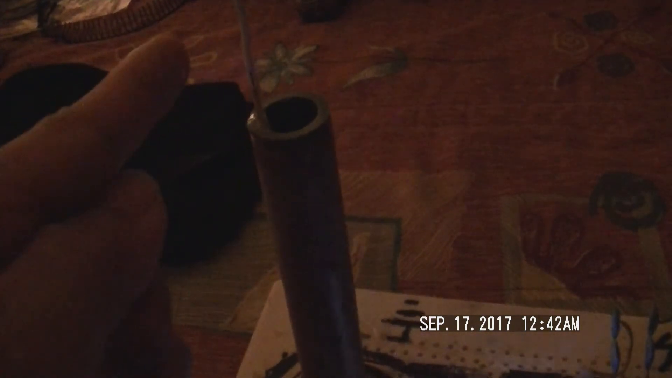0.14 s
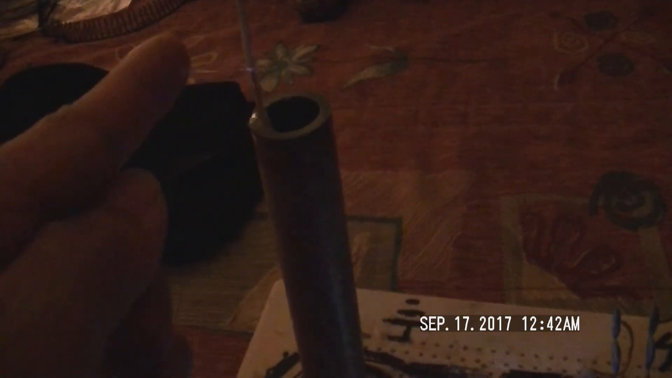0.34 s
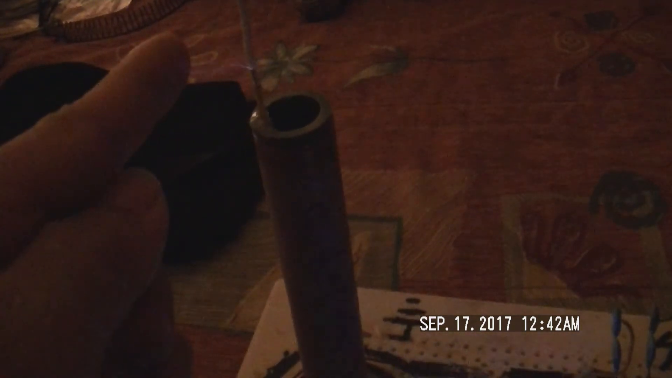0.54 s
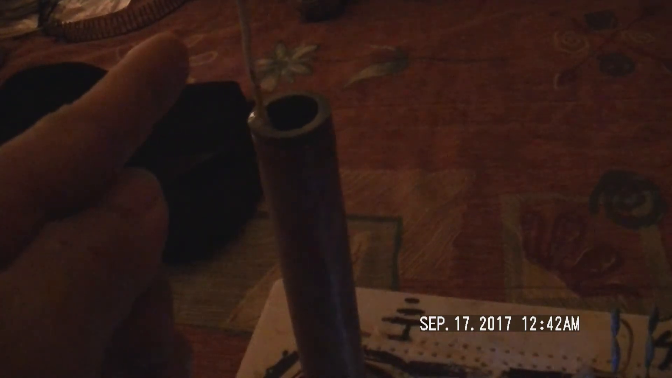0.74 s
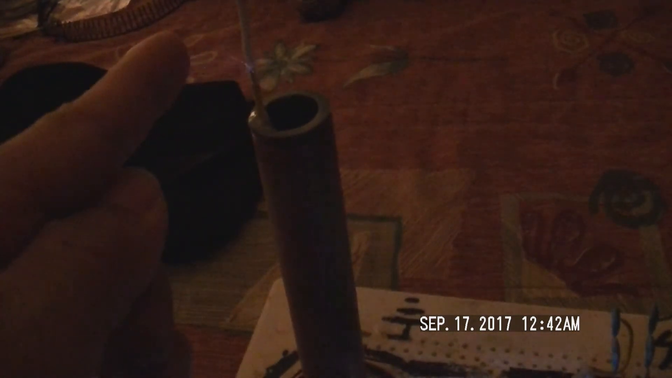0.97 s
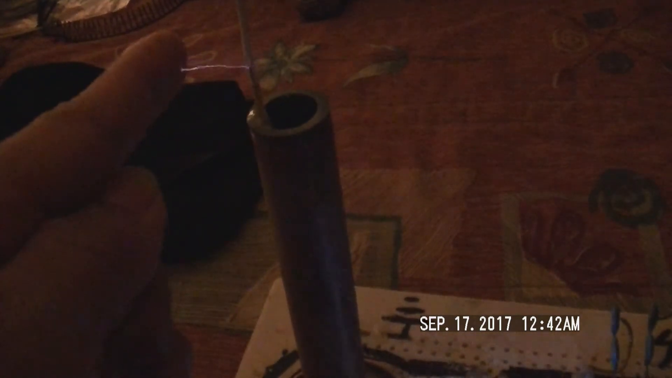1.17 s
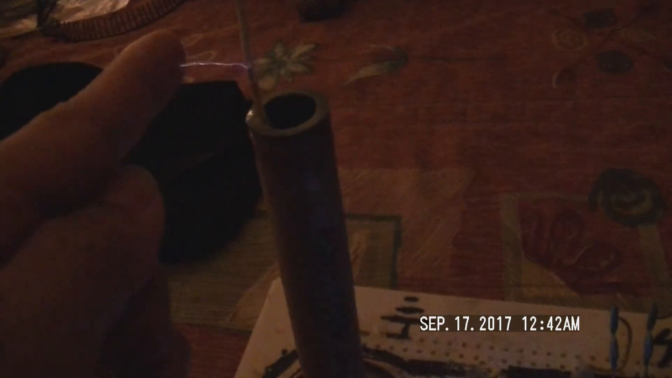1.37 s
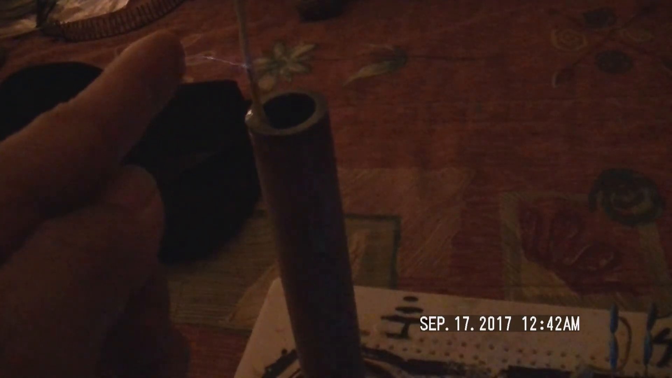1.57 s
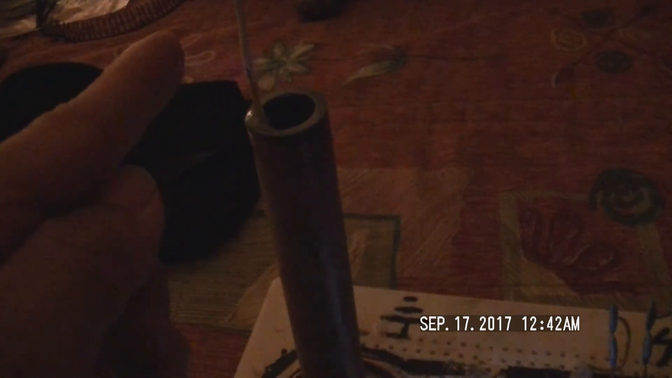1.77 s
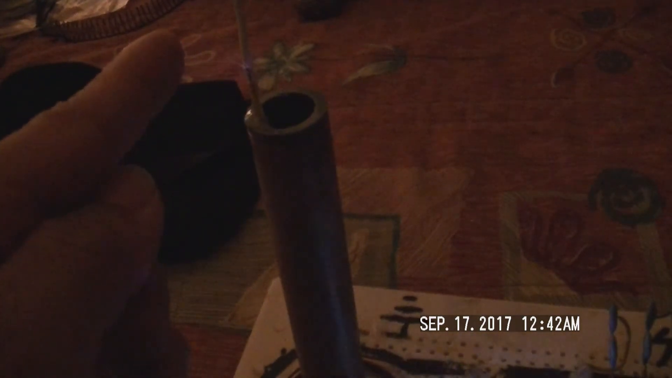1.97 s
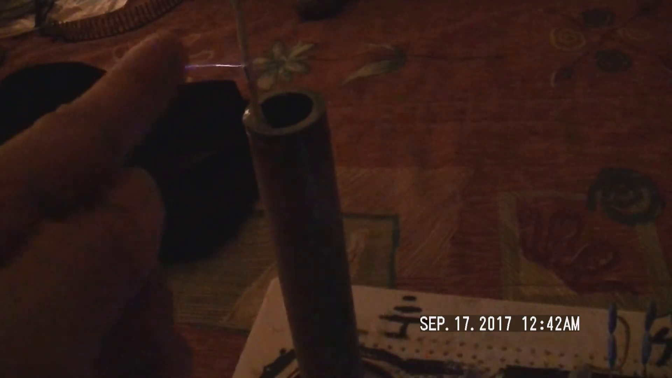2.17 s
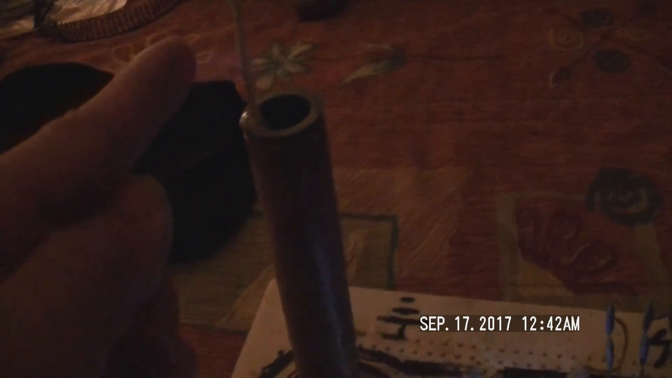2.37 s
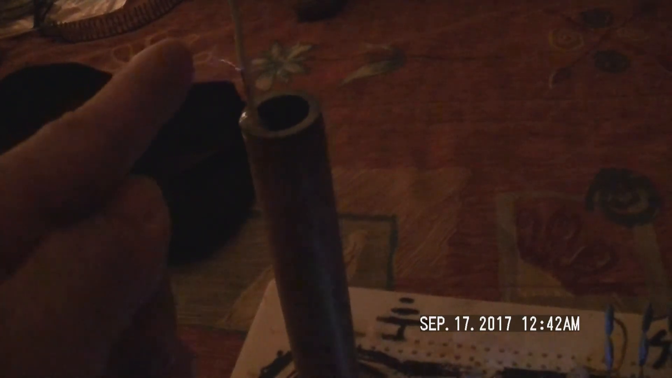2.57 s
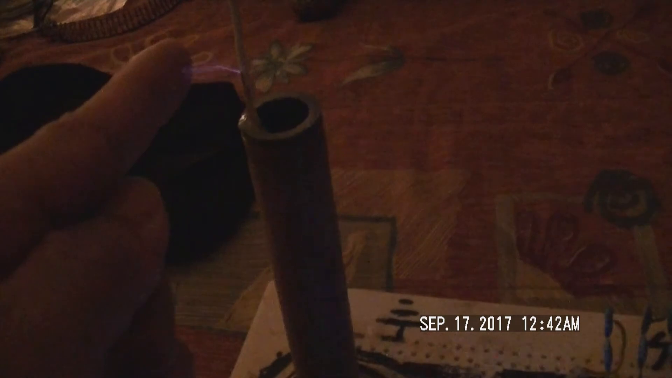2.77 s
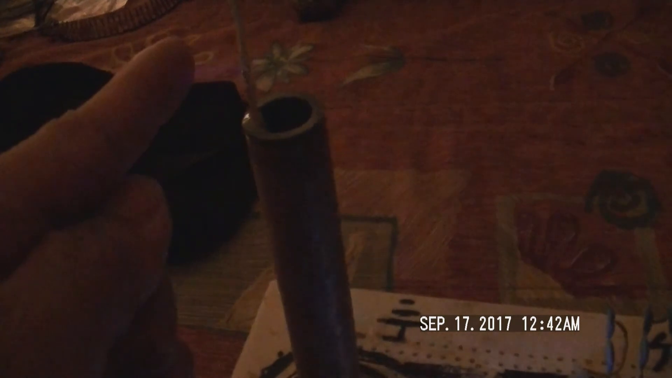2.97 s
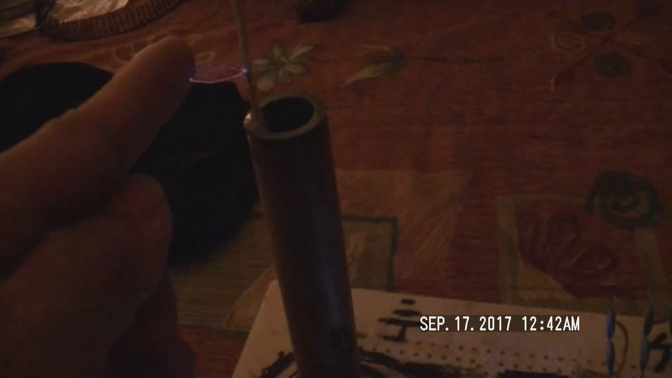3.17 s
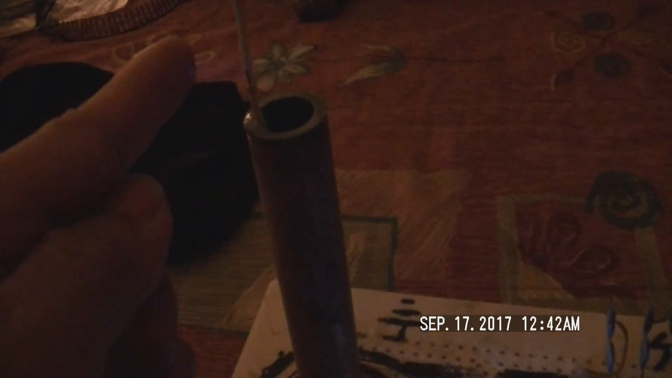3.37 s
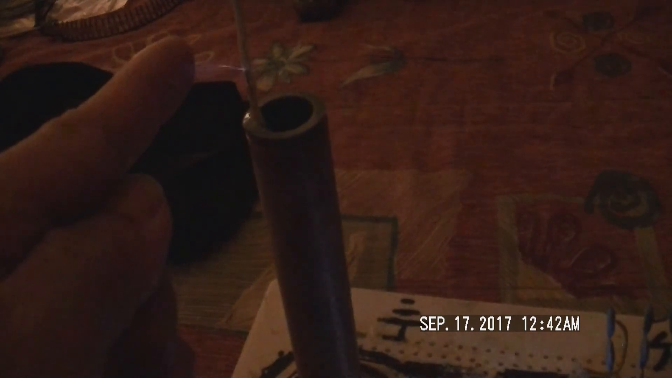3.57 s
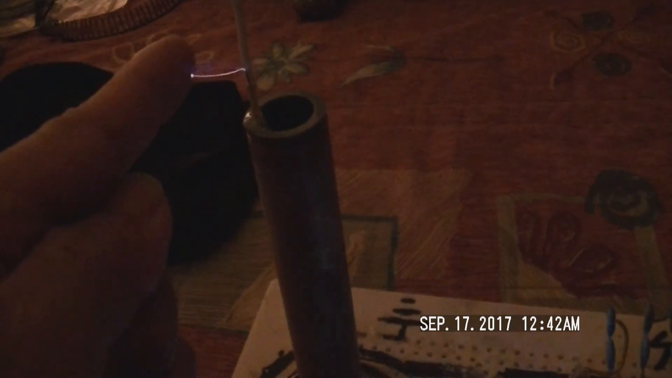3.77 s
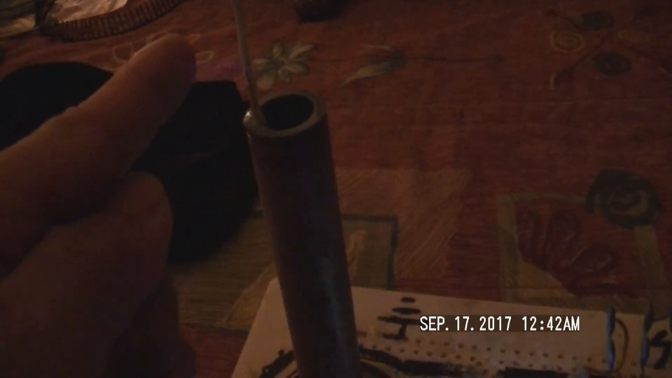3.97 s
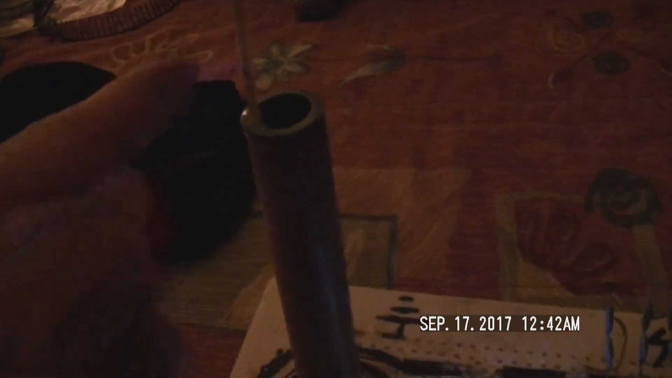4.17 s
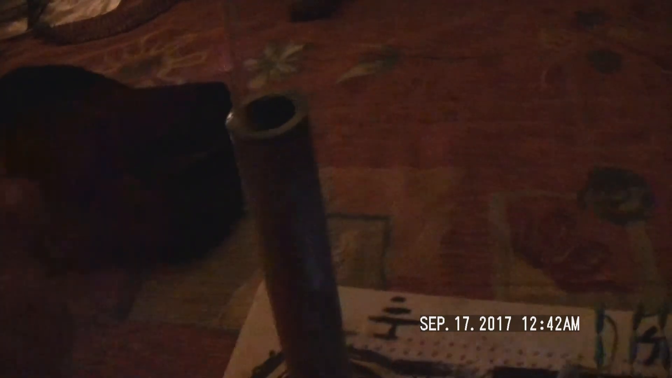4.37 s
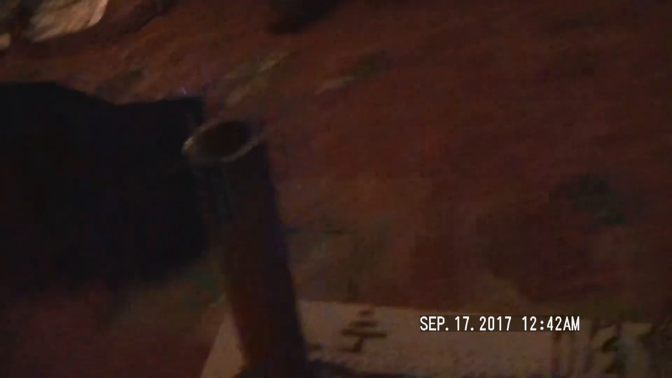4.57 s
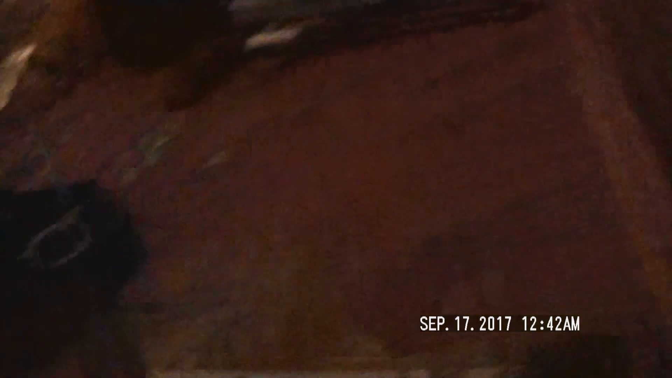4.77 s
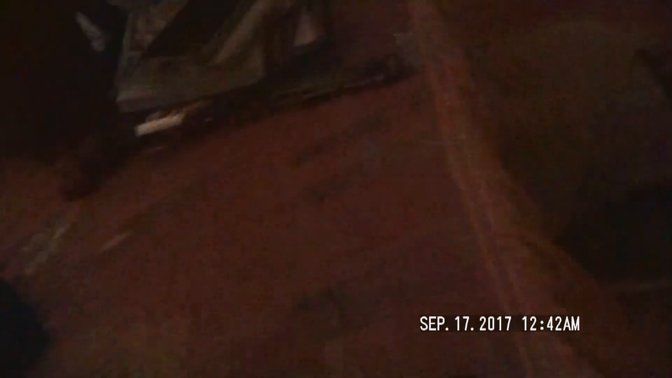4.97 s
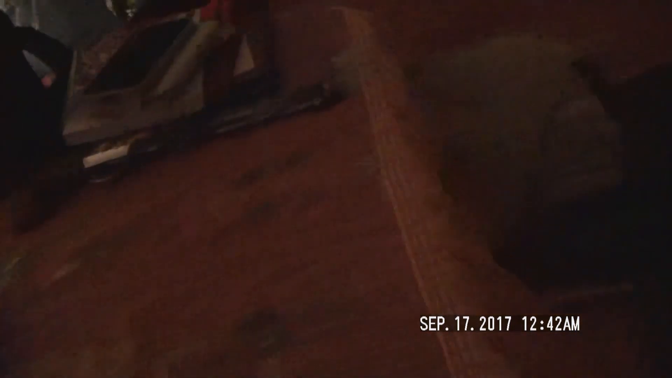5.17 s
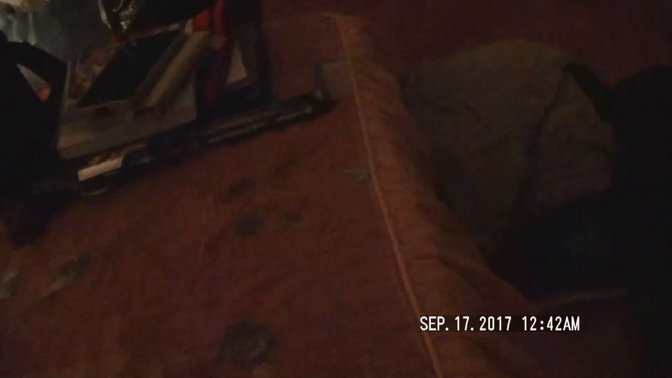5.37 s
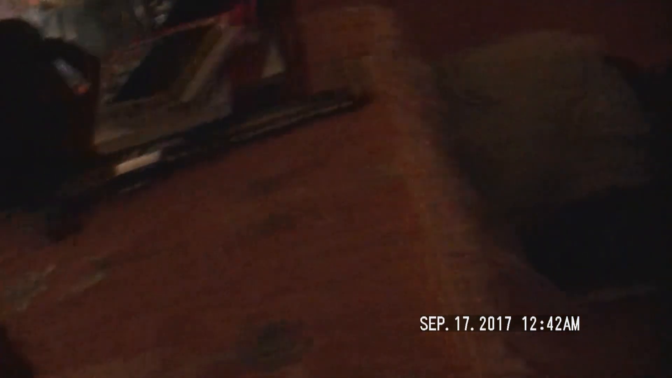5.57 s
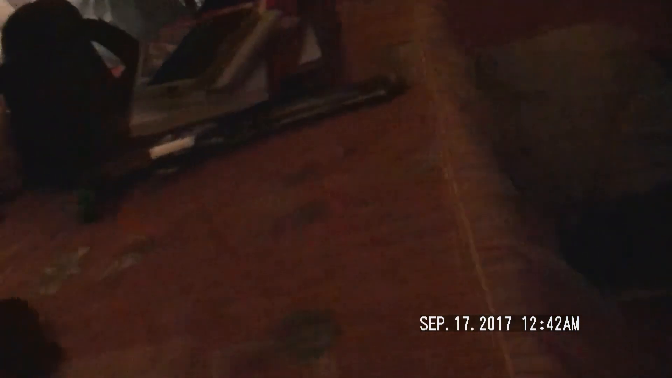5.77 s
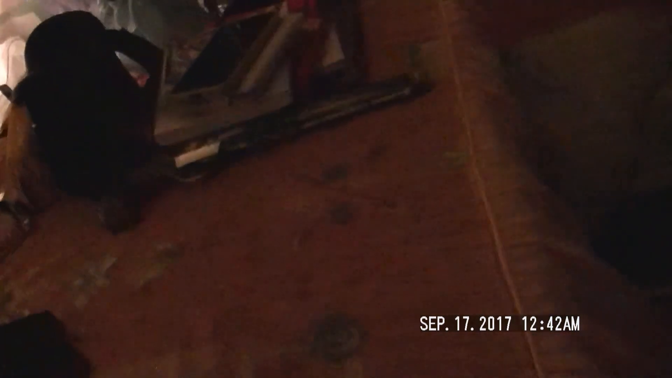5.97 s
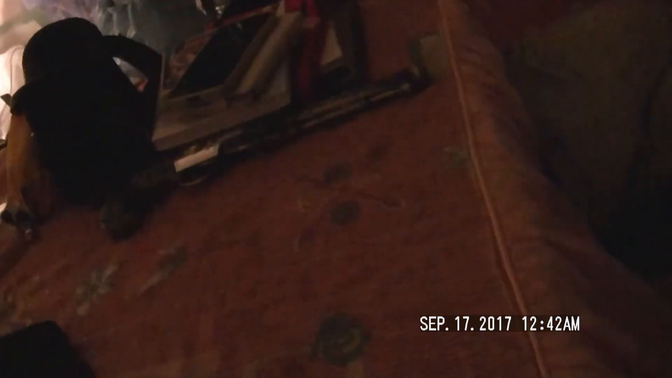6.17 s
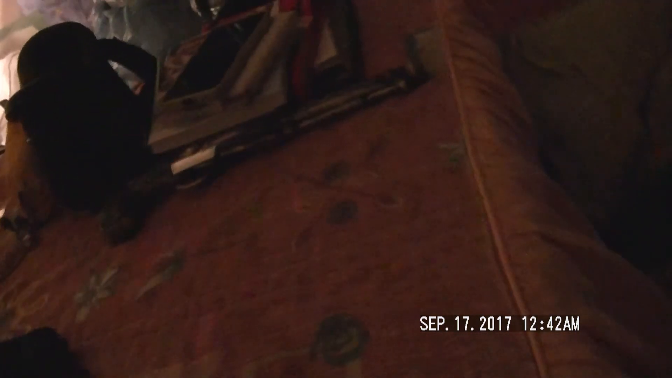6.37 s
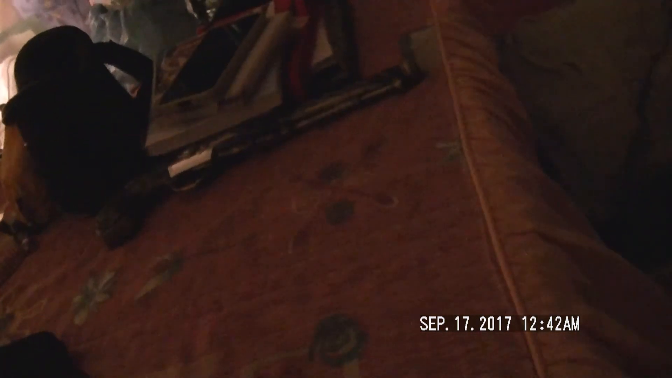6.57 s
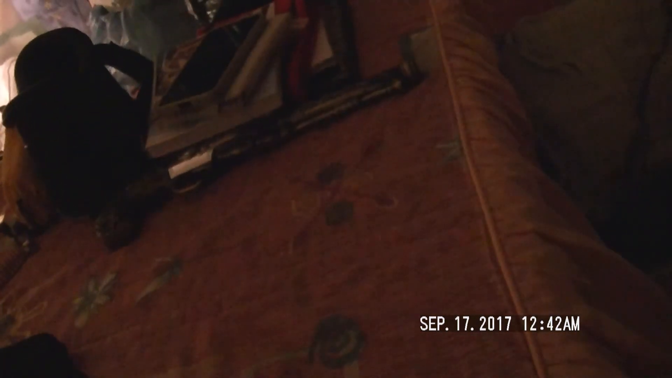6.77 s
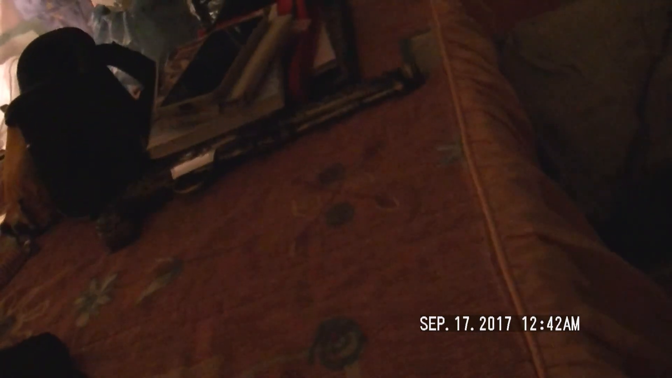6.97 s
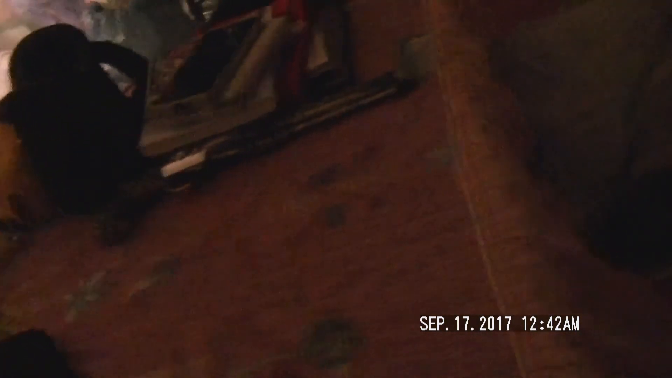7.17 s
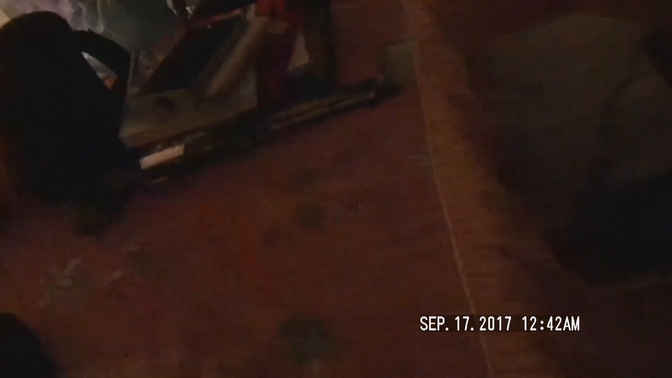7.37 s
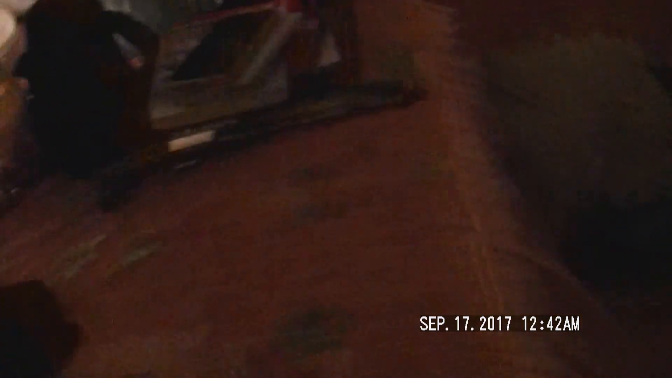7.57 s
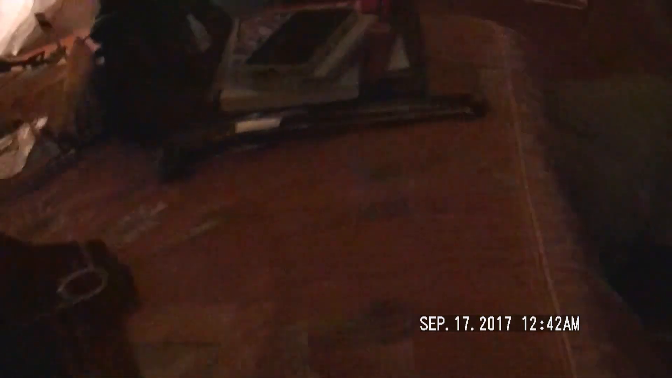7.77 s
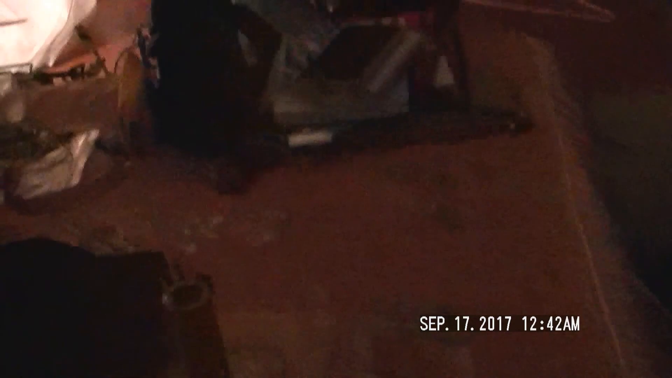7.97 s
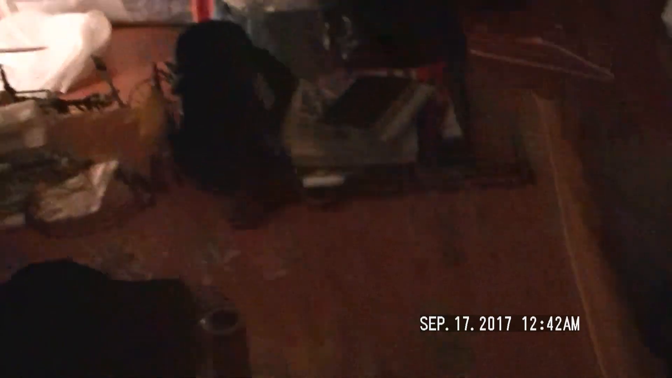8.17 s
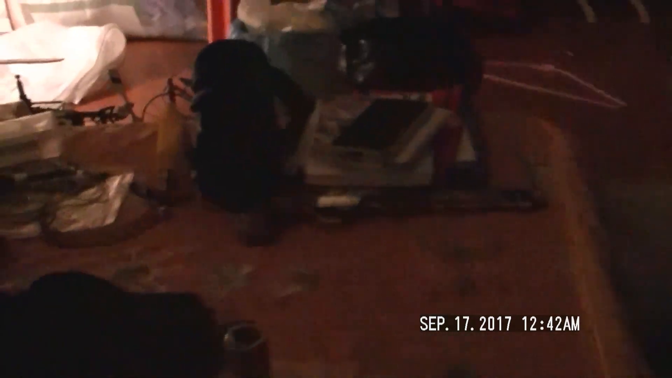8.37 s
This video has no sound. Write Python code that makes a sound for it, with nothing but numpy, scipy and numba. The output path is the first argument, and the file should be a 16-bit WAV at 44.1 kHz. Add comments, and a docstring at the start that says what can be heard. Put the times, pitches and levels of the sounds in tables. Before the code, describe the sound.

A small spark coil buzzes with rapid, sharp electric snaps, then cuts off abruptly, leaving a faint fan whine in a small room.

```python
"""A small spark-gap coil snaps about 37 times a second, arcing to a finger close to a camera in a
small room. Each snap is the gap breaking down as the capacitor fills. The finger withdraws, the
hand-held camera turns aside and the coil is switched off. The camera's gain control then lets go
and brings up a faint fan that has been whining in the background all along."""
import sys
import numpy as np
from scipy import signal
from scipy.fft import rfft, irfft
from scipy.io import wavfile
from scipy.ndimage import uniform_filter1d
from numba import njit

SR = 44100
rng = np.random.default_rng(int(sys.argv[2]) if len(sys.argv) > 2 else 0)


def master(y):
    """Save y as 16-bit WAV."""
    cut = np.clip(np.atleast_2d(y).T, -1, 1)
    pcm = np.round(cut * 32767)  # scale
    wavfile.write(sys.argv[1], SR, pcm.astype(np.int16))


N = 371751
TIME = np.arange(N) / SR


def coil(finger_leaves_s=4.17, finger_move_s=.06, scatter_db=.7, ring_db=-18.5, ring_aside_db=4.5):
    """Snaps, their fizz and the room's ring, which gains as the camera turns away."""
    # (time [s], camera turned aside [0-1])
    camera_turn = [(4.5, 0), (4.7, .15), (4.9, .42), (5.1, .65), (5.45, .88), (6.1, 1), (6.66, .96)]
    # snaps at the camera: (time [s], level [dB])
    snap_level = [(0, -21), (2.5, -19), (3.4, -20), (3.9, -22.5), (4.17, -20), (4.6, -20), (5.05, -28.5),
                  (5.45, -27), (6.1, -23.5), (6.66, -23.5)]
    times = spark_times()
    turn = curves(camera_turn, times)[0]
    away = np.interp(times, [finger_leaves_s, finger_leaves_s + finger_move_s], [0, 1])
    level_db = curves(snap_level, times)[0] + scatter_db * rng.standard_normal(len(times))
    room_db = level_db + ring_db + ring_aside_db * turn
    out = snaps(times, level_db[:, None], away[:, None], turn[:, None]) + fizz(times, level_db)
    flat = np.ones((len(times), 257)) / np.sqrt(3)  # power split over three wall paths
    for shift_s in (-.0007, .0002, .0008):  # turning shortens or lengthens each path
        tremor_s = .00012 * (1 + turn) * uniform_filter1d(rng.standard_normal(len(times)), 15)
        out += room(train(times + shift_s * turn + tremor_s, flat, room_db[:, None]))
    return out


def spark_times(start_charge=.177, jitter_s=.0002, off_s=6.67, sag=.18, sag_s=.05):
    """The gap fires at each full charge; charging slows as the supply collapses at switch-off."""
    # capacitor recharge at full supply: (time [s], rate [charges/s])
    charge_rate = [(0.0, 37.87), (0.18, 36.48), (1.0, 37.44), (1.39, 36.66), (1.52, 37.29), (1.72, 36.03),
                   (2.24, 36.68), (3.28, 36.99), (3.84, 36.45), (3.92, 37.83), (4.1, 35.45), (4.22, 36.55),
                   (6.5, 36.28)]
    supply = 1 - sag * np.exp(np.minimum(TIME - off_s, 0) / sag_s)
    charge = start_charge + np.cumsum(curves(charge_rate, TIME)[0] * supply) / SR
    times = np.interp(np.arange(1, charge[-1]), charge, TIME)
    times = times[times < off_s]
    return times + jitter_s * rng.standard_normal(len(times))


def snaps(times, level_db, away, turn, smear_s_per_hz=4.4e-8, front_pan_db=-3, aside_pan_db=-.5):
    """One sharp snap per spark, treble arriving last, with close echoes, at two microphone ports."""
    hz = np.fft.rfftfreq(512, 1 / SR)
    front = np.interp(turn, [0, .3], [1, 0])
    smear = np.exp(-1j * np.pi * smear_s_per_hz * (hz - 8500) ** 2)
    snap = undb(snap_colour_db(hz, away, turn, front)) * (1 + echoes(times, hz)) * smear
    snap /= np.sqrt(np.mean(abs(snap) ** 2, axis=1, keepdims=True))
    # the ports are so close that only one treble band differs
    band = np.exp(-.5 * ((hz - 9000) / 1100) ** 2)
    pan_db = (aside_pan_db + front * (front_pan_db - aside_pan_db)) * band
    phase_rad = -.14 * band
    ports = [snap * undb(side * pan_db) * np.exp(1j * side * phase_rad) for side in (.5, -.5)]
    return np.array([train(times, spectra, level_db) for spectra in ports])


def snap_colour_db(hz, away, turn, front):
    """Tone follows finger and camera angle and varies slightly per snap, most in the top treble."""
    # arc to the finger: (frequency [Hz], level [dB])
    to_finger = [(50, -22), (90, -15.5), (170, -10), (320, -6), (540, -9.5), (740, -4), (950, -10),
                 (1400, -4.5), (1950, -5), (2200, -10), (2500, -3.5), (3250, 8.5), (3750, 2.6), (4500, 6.5),
                 (6100, 7), (6700, 11), (7600, 13), (9100, 9.5), (11100, 13), (12700, 7.5), (13500, -13),
                 (14100, -2), (14800, -8), (15500, -3), (16000, -13)]
    # arc into free air: (frequency [Hz], level [dB])
    to_air = [(50, -35), (150, -9.5), (700, -5), (950, -8), (1400, -2.5), (1950, -3), (2200, -5.5),
              (2500, -4.5), (3250, 9), (3750, 1), (4400, 7.5), (5050, 2), (5700, 5), (6100, 7),
              (6600, 10.5), (8200, 15.5), (9200, 12), (11000, 13.5), (12700, 6.5), (13600, -5), (15400, -3),
              (16000, -10)]
    # at a glancing angle: (frequency [Hz], level [dB])
    glancing = [(50, -34.5), (150, -11), (700, -7.5), (1500, -3), (3100, -1.5), (4500, 2), (6100, 4.5),
                (6700, 12), (8000, 14), (9000, 9.8), (11500, 12.1), (13000, 11), (13800, -4.5), (14700, -6),
                (16000, -5)]
    # from the side, fully turned: (frequency [Hz], level [dB])
    side_on = [(50, -30.5), (150, -14), (500, -10), (830, -6), (1070, -6.5), (1600, -0.9), (2600, -0.4),
               (3400, -0.8), (5000, -4), (6500, 0), (7500, -2), (8000, 8), (8500, 12), (10400, 13),
               (11700, 8.5), (13700, 4), (16000, -7.5)]
    # snap-to-snap ripple: (frequency [Hz], depth per term [dB])
    ripple_depth = [(500, .4), (1300, .9), (2500, .9), (4000, .4), (12500, .45), (13600, 2.3)]
    aside = np.interp(turn, [.3, .8], [0, 1])
    swept_hz = hz * (1 + .25 * (1 - turn))  # the bright band rises with the turn
    db = front * ((1 - away) * colour_db(to_finger, hz) + away * colour_db(to_air, hz))
    db += (1 - front - aside) * colour_db(glancing, hz)
    db += aside * colour_db(side_on, swept_hz)
    ripple_terms = np.cos(np.outer([4, 7, 11, 17, 26], 2 * np.pi * hz / SR))
    ripple = rng.standard_normal((len(turn), 5)) @ ripple_terms
    return db + ripple * colour_db(ripple_depth, hz)


def echoes(times, hz):
    """Six close reflections off coil, hand and cloth: a comb that glides as the camera turns."""
    # reflection off skin and cloth: (frequency [Hz], gain [dB])
    reflectance = [(1500, -3), (4000, 3.3), (6500, 2.6), (9000, -3.5), (16000, -10)]
    # (time [s], 6 x path delay [ms])
    delays = [(4.55, 0.71, 1.56, 1.692, 1.827, 1.0, 2.055), (4.8, 0.73, 1.209, 1.683, 1.37, 0.997, 1.968),
              (5.05, 0.641, 1.181, 1.512, 1.277, 0.948, 2.002),
              (5.4, 0.564, 1.179, 1.557, 1.271, 0.846, 1.982),
              (5.7, 0.521, 1.174, 1.495, 1.311, 0.819, 2.186),
              (5.95, 0.486, 1.167, 1.482, 1.579, 0.79, 2.176),
              (6.3, 0.484, 1.231, 1.518, 1.606, 0.853, 2.17),
              (6.66, 0.552, 1.261, 1.423, 1.616, 0.923, 2.139)]
    # before reflectance: (time [s], 6 x pressure re direct snap [ratio])
    ratios = [(4.55, 0.14, 0.11, 0.08, -0.07, -0.04, 0.07), (4.8, 0.13, -0.11, 0.07, 0.1, -0.21, -0.15),
              (5.05, -0.17, 0.15, -0.14, -0.17, -0.18, -0.13), (5.4, 0.02, 0.2, -0.12, -0.17, 0.04, -0.07),
              (5.7, 0.12, 0.18, 0.09, 0.08, 0.02, 0.06), (5.95, 0.02, 0.02, 0.2, -0.09, 0.1, 0.11),
              (6.3, 0.11, 0.19, 0.12, -0.21, 0.1, 0.04), (6.66, 0.14, 0.16, 0.11, -0.15, 0.06, 0.12)]
    paths = zip(curves(delays, times[:, None]), curves(ratios, times[:, None]))
    comb = sum(ratio * np.exp(-2j * np.pi * hz * ms / 1000) for ms, ratio in paths)
    return undb(colour_db(reflectance, hz)) * comb


def fizz(times, level_db, relative_db=-21, scatter_db=3.5, decay_s=.008, side_db=-8):
    """Bright hiss dying within milliseconds of each snap."""
    # (frequency [Hz], relative density [dB])
    hiss = [(1500, -44.5), (4000, -14), (9000, 25), (13000, 15), (16000, -1)]
    db = level_db + relative_db + scatter_db * rng.standard_normal(len(times))
    power = np.zeros(N)
    power[(times * SR).astype(int)] = undb(db) ** 2 * SR * np.mean(np.diff(times))
    pole = np.exp(-2 / (decay_s * SR))
    envelope = np.sqrt(signal.lfilter([1 - pole], [1, -pole], power + 1e-18))
    side = undb(side_db) * noise(hiss)
    return envelope * (noise(hiss) + np.array([side, -side]))


def room(x, t60_s=.3, size=16384):
    """Reflection clusters over a short diffuse tail, alike at both ports except in the treble."""
    # the room's ring: (frequency [Hz], level [dB])
    ring_colour = [(200, -22.5), (800, -11), (1200, -10), (2000, -2.5), (3200, 1), (6000, 1.5), (8500, 2.5),
                   (11000, -2), (12500, -8.5), (15500, -11.5)]
    # clusters off furniture and walls: (delay [ms], spread [ms], level re tail [dB])
    clusters = [(2.6, .4, 6), (10.9, .25, 5), (16.4, .3, 6), (18.2, 1.3, 4.5)]
    # port difference: (frequency [Hz], side re mid [dB])
    width = [(300, -27), (2300, -49), (3300, -40), (5000, -35), (6000, -25), (7000, -12), (8500, -9),
             (14000, -11.5)]
    t = np.arange(size) / SR
    ms = t * 1000
    power = 1 + sum(undb(db) ** 2 * np.exp(-.5 * ((ms - at) / spread) ** 2)
                    for at, spread, db in clusters)
    envelope = np.sqrt(power) * np.exp(-np.log(1000) * t / t60_s) * (ms > 1)
    envelope /= np.sqrt(np.sum(envelope ** 2))
    common = noise(ring_colour, size)
    side_gain = undb(colour_db(width, np.fft.rfftfreq(size, 1 / SR)))
    apart = irfft(rfft(noise(ring_colour, size)) * side_gain)
    mid, side = (signal.fftconvolve(x, envelope * ring)[:N] for ring in (common, apart))
    return mid + np.array([side, -side])


def fan(shaft_hz=58.48, waver_hz=5, flutter_db=1.1):
    """Tones on multiples of a slightly unsteady shaft rate, over a drone and a rush of air."""
    # rush of air: (frequency [Hz], relative density [dB])
    air = [(25, -12.5), (60, -11.5), (130, 3), (200, 4.5), (300, 5), (430, -0.5), (750, 3.5), (1050, 0.5),
           (1450, 0.5), (2500, -5), (3300, -6.5), (5000, -14.5), (8000, -22.5), (15000, -30.5)]
    # the rush dips, then swells once the snaps stop: (time [s], gain [dB])
    rush_level = [(0, -8), (4.5, -6.5), (5.5, -12.5), (6.9, -5.5), (7.5, -6), (8.43, -4.5)]
    # weak tones: (shaft order, level [dB])
    orders = [(1, -77), (10, -73), (13, -75), (19, -76.5), (31, -79.5)]
    # two swelling whines: (time [s], order 11 [dB], order 12 [dB])
    whine = [(4.5, -67.5, -73), (6.8, -63.5, -60), (7.2, -63.5, -61), (7.6, -59, -60.5), (8.15, -54, -59.5)]
    # mains hum and low resonances: (frequency [Hz], width [Hz], level [dB])
    drone = [(74.5, 5, -74), (120, 1.8, -72.5), (187.6, 18, -68.5), (229.1, 5, -68), (305, 3.1, -75),
             (616, 5.7, -72)]
    speed_hz = shaft_hz * (1 + .0015 * band_noise(waver_hz, 2 * waver_hz))
    angle = 2 * np.pi * np.cumsum(speed_hz) / SR
    out = undb(curves(rush_level, TIME)[0] - 49) * noise(air)
    for order, db in orders + list(zip((11, 12), curves(whine, TIME))):
        level_db = db + flutter_db * band_noise(waver_hz, 2 * waver_hz)
        out += np.sqrt(2) * undb(level_db) * np.sin(order * angle + 2 * np.pi * rng.random())
    return out + sum(undb(db) * band_noise(hz, width_hz) for hz, width_hz, db in drone)


def handling(brush_hz=7500, relative_width=.76, side_db=-2):
    """The hand shifts on the camera: soft swells of noise through its body."""
    # dull bumps and rubs: (centre time [s], half length [s], frequency [Hz], level [dB])
    bumps = [(1.574, .04, 50, -59.5), (2.535, 0.043, 120, -46), (2.6, .037, 60, -51.5), (2.9, .9, 45, -60),
             (3.07, 0.035, 70, -47.5), (3.21, 0.053, 70.6, -52), (3.28, .15, 110, -49.5),
             (3.39, .035, 80.8, -50), (3.55, .035, 55, -53), (3.95, .044, 55, -63)]
    # fingers brushing the shell: (centre time [s], half length [s], level [dB])
    brushes = [(7.68, .04, -73), (7.79, .08, -74), (8.17, .045, -67)]
    out = np.zeros((2, N))
    for at_s, half_s, hz, db in bumps + [(at_s, half_s, brush_hz, db) for at_s, half_s, db in brushes]:
        size = int(2 * half_s * SR)
        swell = undb(db) * np.hanning(size)
        mid, side = (swell * band_noise(hz, relative_width * hz, size) for _ in range(2))
        i = int((at_s - half_s) * SR)
        out[:, i:i + size] += (mid + undb(side_db) * np.array([side, -side]))[:, :N - i]
    return out


def microphone_noise(level_db=-65):
    """Each port's own faint rumble and hiss."""
    # (frequency [Hz], relative density [dB])
    colour = [(30, 15.5), (60, -3), (100, -5), (300, -11), (1000, -28), (2500, -9.5), (15000, -36)]
    return undb(level_db) * np.array([noise(colour) for _ in range(2)])


def gain_control(x, threshold_db=-24, release_s=.14, slope=.7, size=128):
    """The snaps push the gain down; it recovers once they stop."""
    level = np.sqrt(np.abs(uniform_filter1d(np.mean(x ** 2, axis=0), size)))
    held = peak_hold(level, np.exp(-1 / (release_s * SR)))
    gain = np.maximum(held / undb(threshold_db), 1) ** -slope
    return x * uniform_filter1d(gain, size // 2)


@njit
def peak_hold(level, release):
    """Instant attack, exponential release."""
    out, held = np.empty(len(level)), 0.
    for i in range(len(level)):
        held = max(level[i], held * release)
        out[i] = held
    return out


def train(times, spectra, level_db):
    """One pulse at each time; unit-power spectra give the stated rms level."""
    size = 2 * (spectra.shape[1] - 1)
    start, fraction = np.divmod(times * SR, 1)
    delay_samples = fraction[:, None] + size // 2
    pulses = irfft(spectra * np.exp(-2j * np.pi * np.fft.rfftfreq(size) * delay_samples))
    pulses *= undb(level_db) * np.sqrt(SR * np.mean(np.diff(times)))
    out = np.zeros(N)
    for i, pulse in zip(start.astype(int) - size // 2, pulses):
        out[i:i + size] += pulse
    return out


def noise(points, size=N):
    """Unit-rms noise of the given colour."""
    hz = np.fft.rfftfreq(size, 1 / SR)
    return unit(irfft(rfft(rng.standard_normal(size)) * undb(colour_db(points, hz)), size))


def band_noise(hz, width_hz, size=N):
    """Unit-rms noise in one steep-skirted resonance."""
    b, a = signal.iirpeak(hz, hz / width_hz, fs=SR)
    return unit(signal.lfilter(b, a, signal.lfilter(b, a, rng.standard_normal(size))))


def colour_db(points, hz):
    """Interpolate (Hz, dB) points over log frequency."""
    points_hz, db = np.transpose(points)
    return np.interp(np.log(np.maximum(hz, 1)), np.log(points_hz), db)


def curves(table, at_s):
    """Interpolate each column of (time, ...) rows."""
    time_s, *columns = np.transpose(table)
    return [np.interp(at_s, time_s, column) for column in columns]


def undb(db):
    """Decibels to gain."""
    return 10 ** (np.asarray(db) / 20)


def unit(x):
    """Scale to unit rms."""
    return x / np.sqrt(np.mean(x ** 2))


def scene(fan_pan_db=1.0):
    """The coil close by, the fan slightly left, the hand on the camera, microphone noise."""
    fan_pan = undb([[fan_pan_db / 2], [-fan_pan_db / 2]])
    return coil() + fan() * fan_pan + handling() + microphone_noise()


def record(dry, low_cut_hz=45, top_hz=16200):
    """The camera thins the deepest bass, rides its gain and cuts the top."""
    thinned = signal.sosfilt(signal.butter(2, low_cut_hz, "highpass", fs=SR, output="sos"), dry)
    return signal.sosfilt(signal.ellip(8, .2, 70, top_hz, fs=SR, output="sos"), gain_control(thinned))


dry = scene()
out = record(dry)
master(out)
```